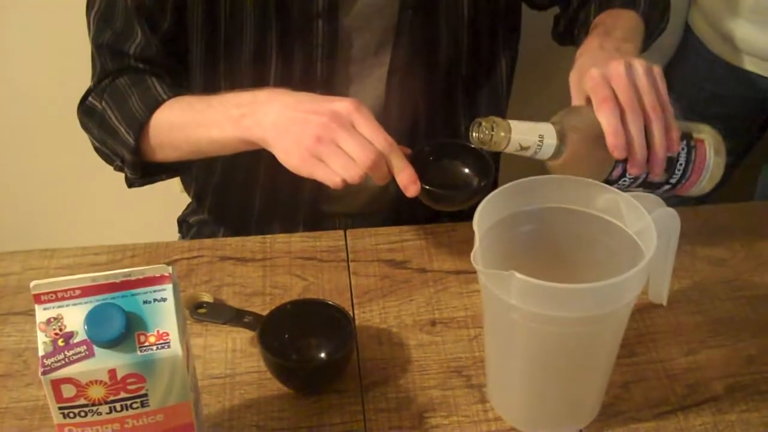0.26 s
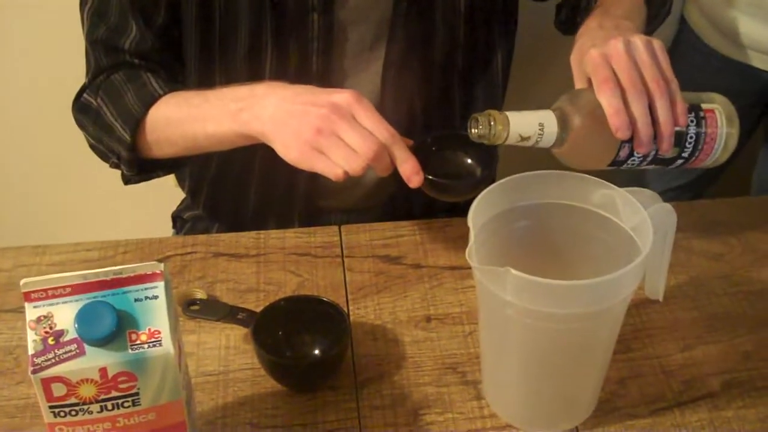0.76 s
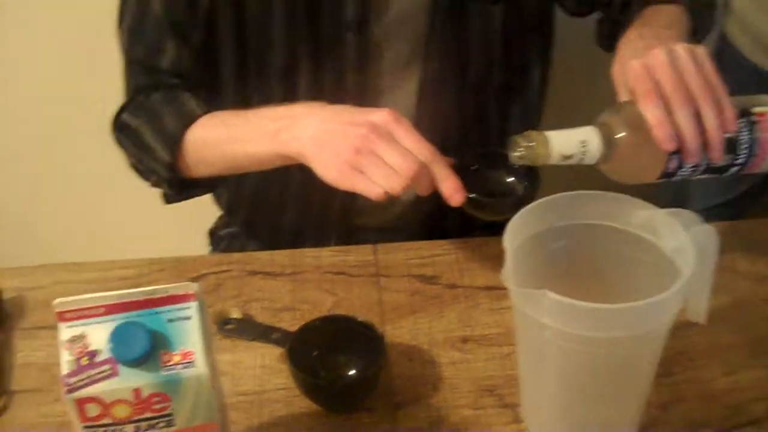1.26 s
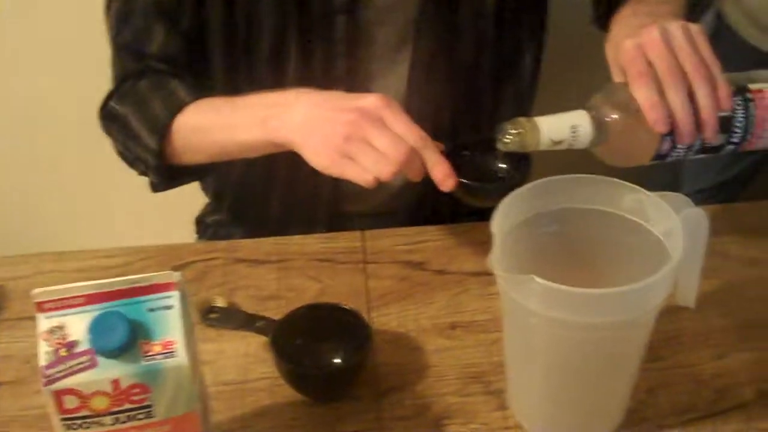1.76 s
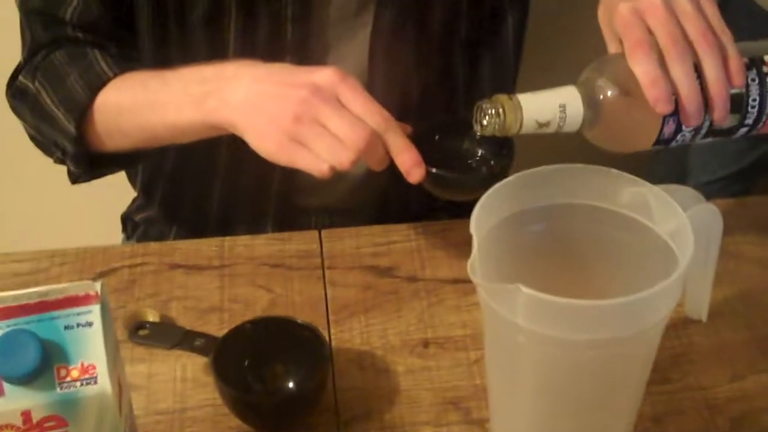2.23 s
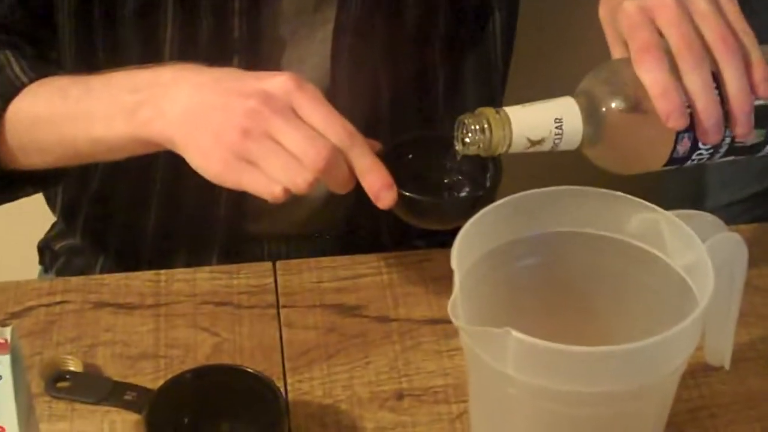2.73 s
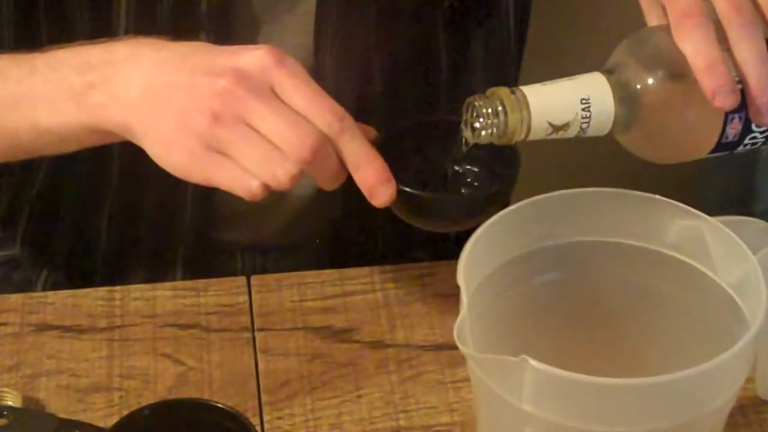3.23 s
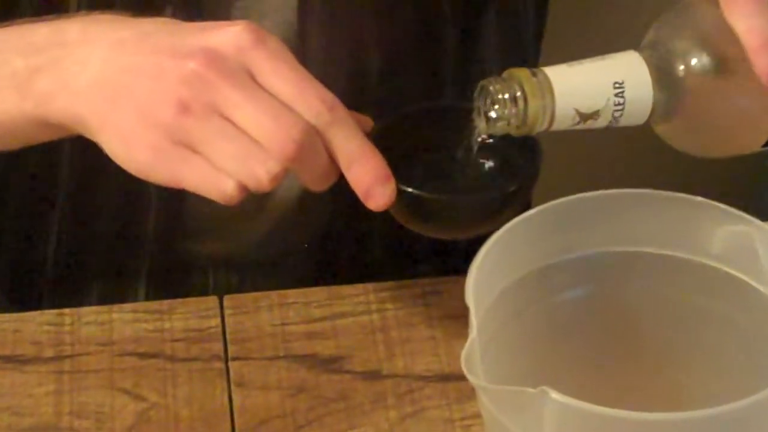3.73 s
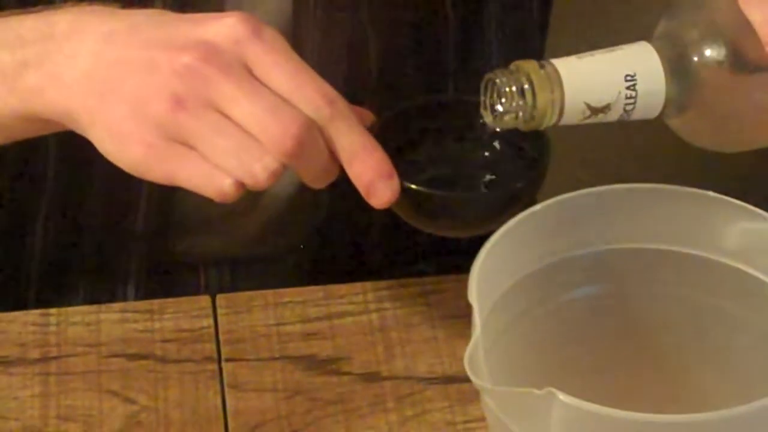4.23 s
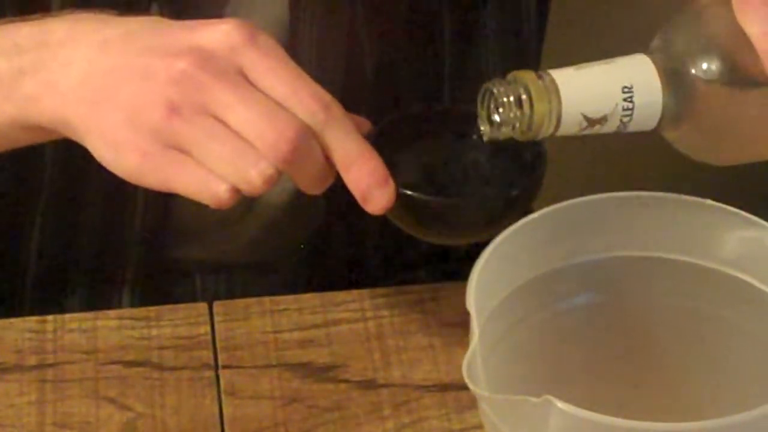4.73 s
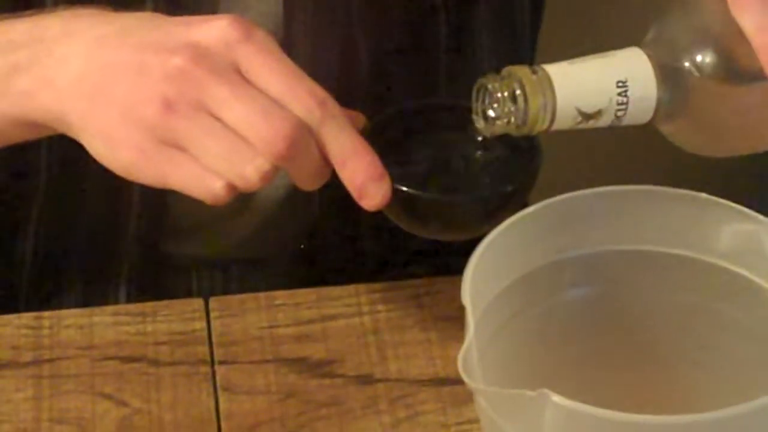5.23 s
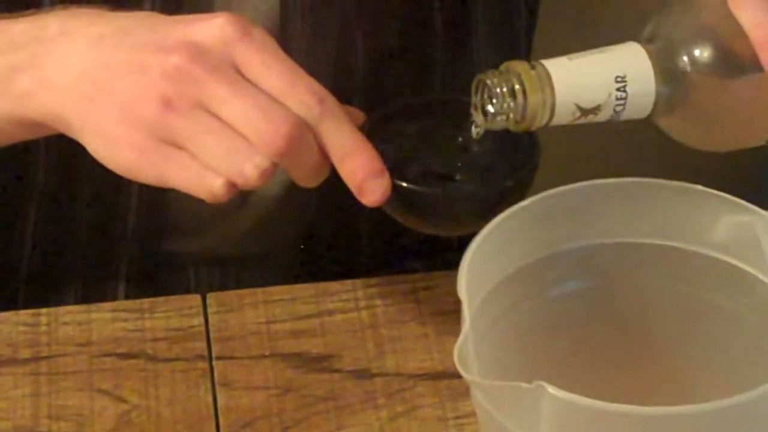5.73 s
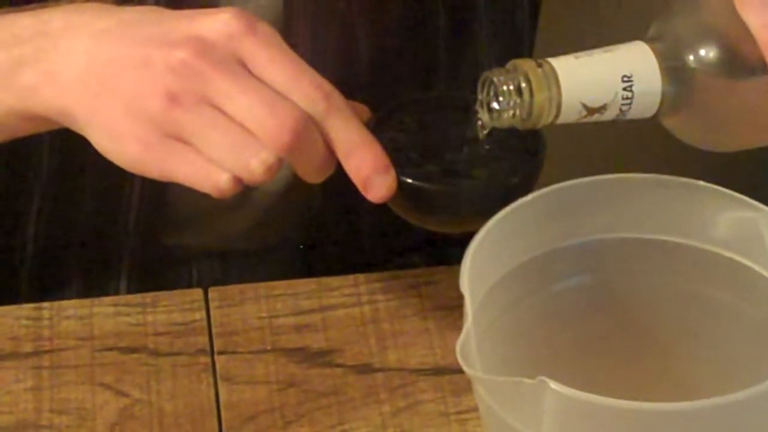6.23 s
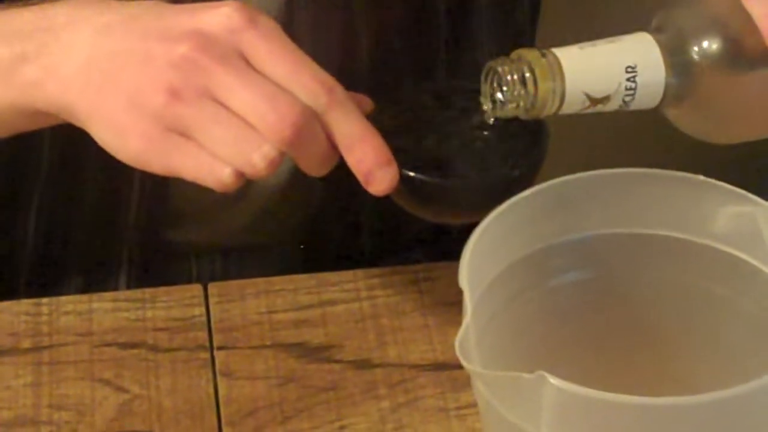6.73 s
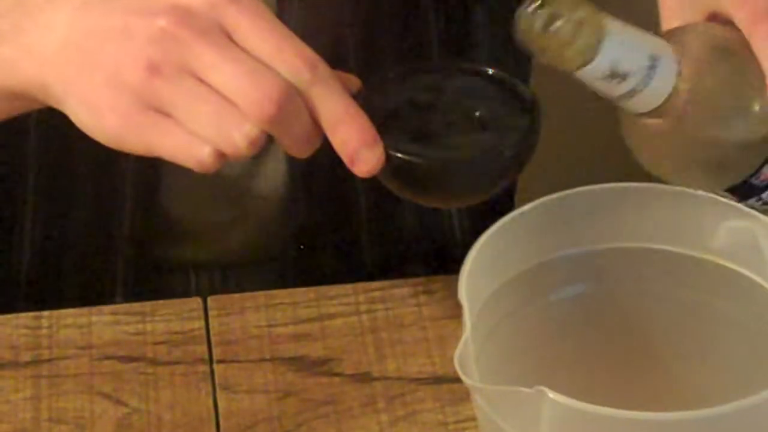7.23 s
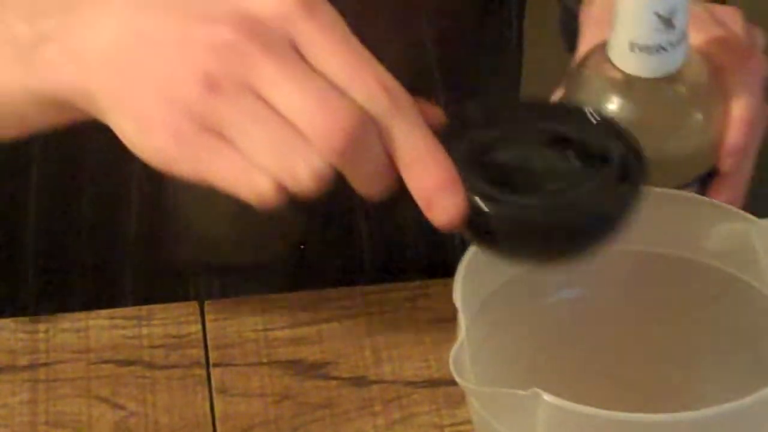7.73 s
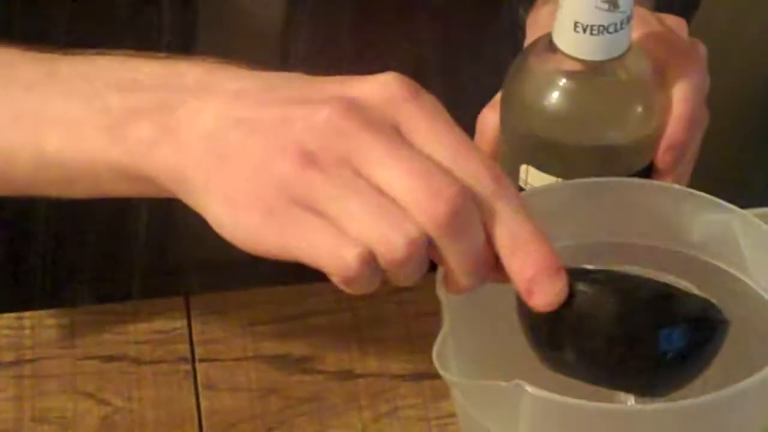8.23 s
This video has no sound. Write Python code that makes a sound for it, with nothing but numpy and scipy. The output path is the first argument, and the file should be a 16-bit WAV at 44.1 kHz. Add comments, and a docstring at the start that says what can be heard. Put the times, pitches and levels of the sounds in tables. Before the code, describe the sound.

Close bottle gulps, glassy clinks and tiny high plips over faint hum, then the bottle knocks down on a table and liquid splashes into a pitcher.

```python
"""An appliance hums in a small room, then air gulps back through the neck of a glass bottle:
spirit is poured slowly into a plastic measuring cup. The bottle clinks on the cup and drops ping in the liquid.
The bottle is set down on a wooden table and the cup is tipped, splashing, into a pitcher.
Hum is wavering sines, air and spray are coloured noise, gulps and contacts are decaying modes with noise bursts,
and drops and splashes are ringing bubbles; echoes, scattering and a diffuse tail place them in the room."""
import sys
import numpy as np
from scipy import signal
from scipy.fft import rfft, irfft, next_fast_len
from scipy.io import wavfile

SR = 44100
rng = np.random.default_rng(int(sys.argv[2]) if len(sys.argv) > 2 else 0)


def dump_mix(stems):
    """Bounce the given channels to the path in sys.argv[1] as a 16-bit WAV at rate SR."""
    frames = np.atleast_2d(stems).T  # one column per channel
    limited = np.clip(frames, -1, 1)  # hard clip at full scale
    pcm = np.round(limited * 32767).astype(np.int16)
    wavfile.write(sys.argv[1], SR, pcm)


N = 373659
TIME = np.arange(N) / SR
RING = TIME[:SR // 2]   # time axis of a single sound, half a second


def from_db(db):
    """Turn decibels into an amplitude factor."""
    return 10 ** (np.asarray(db) / 20)


def rms_one(x):
    """Scale to an rms of one."""
    return x / np.sqrt(np.mean(x ** 2) + 1e-20)


def peak_one(x):
    """Scale to a peak of one."""
    return x / (np.abs(x).max() + 1e-20)


def at_hz(points, hz):
    """Read a table on a log-frequency axis."""
    known_hz, values = np.transpose(points)
    return np.interp(np.log(np.maximum(hz, 1)), np.log(known_hz), values)


def add(track, s, sound):
    """Mix a sound into a track from time s on."""
    start = min(max(round(s * SR), 0), len(track))
    track[start:start + len(sound)] += sound[:len(track) - start]


def colour(x, spectrum, share=1):
    """Shape a sound by a (f/Hz, level/dB) table, its dB values times share."""
    size = next_fast_len(x.shape[-1] + SR // 20)
    gain = from_db(share * at_hz(spectrum, np.fft.rfftfreq(size, 1 / SR)))
    return irfft(rfft(x, size) * gain, size)[..., :x.shape[-1]]


def soften(x, hz):
    """A softer contact loses its treble: a gentle low-pass."""
    return signal.sosfilt(signal.butter(1, min(hz, .45 * SR), fs=SR, output="sos"), x)


def thin(x, hz):
    """Objects smaller than the wavelength radiate little bass: a high-pass."""
    return signal.sosfilt(signal.butter(2, hz, "high", fs=SR, output="sos"), x)


def fade(t60):
    """Exponential decay that loses 60 dB in t60 seconds."""
    return from_db(-60 * np.minimum(RING / t60, 5))


def ring(modes):
    """Struck modes (f/Hz, level/dB, t60/s) of alternating sign."""
    out = 0
    for k, (hz, db, t60) in enumerate(modes):
        out = out + (-1) ** k * from_db(db) * fade(t60) * np.sin(2 * np.pi * hz * RING)
    return out


def burst(spectrum, t60):
    """Countless close modes die away together like coloured noise."""
    noise = rng.standard_normal(len(RING))
    return rms_one(colour(noise, spectrum)) * fade(t60)


def bubble(hz, cycles, rise):
    """A trapped bubble swells within about a cycle, rings on and rises in pitch as it nears the surface."""
    turns = RING[:int(cycles / hz * SR) + 2] * hz
    age = turns / cycles
    tone = np.sin(2 * np.pi * turns * (1 + rise * age / 2))
    decay = np.exp(-np.log(1000) * age)   # 60 dB down after the given cycles
    return tone * decay * (1 - np.exp(-turns))


# left-right likeness of diffuse sound: (f/Hz, correlation)
DIFFUSE_LIKENESS = [(30, 0.26), (130, 0.91), (500, 0.9), (1300, 0.79), (3000, 0.23), (6500, 0.081),
                    (12000, 0.055)]


def diffuse(size):
    """Stereo noise, most alike at both ports in the low mids and ever less so in the treble."""
    mid, side = rfft(rng.standard_normal((2, size)))
    alike = np.clip(at_hz(DIFFUSE_LIKENESS, np.fft.rfftfreq(size, 1 / SR)), -.999, .999)
    return irfft(np.sqrt(1 + alike) * mid + np.sqrt(1 - alike) * side * [[1], [-1]], size)


def ports(pair, balance):
    """Each microphone port has its own treble resonance, so the balance shifts with frequency."""
    return np.array([colour(pair[0], balance, 0.48), colour(pair[1], balance, -0.52)])


# room air and appliance noise: (f/Hz, level/dB per Hz)
AIR_COLOUR = [(25, -15), (80, -13), (170, -6.5), (310, -0.5), (490, -1), (590, -8.5), (900, -6.5),
              (1400, -14), (2000, -20), (3000, -22.5), (5000, -25), (7000, -26.5), (10000, -31.5),
              (14500, -31.5)]
# appliance hum and a faint electric whine: (f/Hz, rms level/dB, waver share, wavers per s)
HUM_LINES = [(61.2, -70, 0.24, 1.3), (117.8, -67.5, 0.26, 2.7), (219.3, -52, 0.28, 3.99),
             (231.4, -64.5, 0.92, 7.3), (467.2, -51.5, 0.5, 5), (831, -65, 0.76, 20),
             (5970, -78, 0.72, 1.5), (7040, -96, 0.25, 1.5), (7977, -71.5, 0.067, 1.4)]
# tilt of the background between the ports: (f/Hz, left minus right level/dB)
BACKGROUND_BALANCE = [(50, -4.5), (200, 1), (2400, 1.2), (5500, -1.5), (8000, 10), (12000, -0.5)]


def background(air_db=-49):
    """Steady room air, with hum lines that waver in level and phase."""
    noise = diffuse(next_fast_len(N))[:, :N]
    air = from_db(air_db) * rms_one(colour(noise, AIR_COLOUR))
    hum = 0
    for hz, db, waver, per_s in HUM_LINES:
        knots = rng.standard_normal(size=(2, 400))
        swing, lean = (waver * np.interp(TIME * per_s, np.arange(len(k)), k) for k in knots)
        line = (1 + swing / 2) * np.sin(2 * np.pi * hz * TIME + 2 * lean)
        hum = hum + from_db(db) * np.sqrt(2) * line
    return ports(air + hum, BACKGROUND_BALANCE)


# air bubbles bursting behind the bottle neck: (t/s, level/dB)
GULPS = [(0.0974, -43), (0.2956, -40.5), (0.4912, -32), (0.684, -33.5), (0.9737, -34.5), (1.2077, -32),
         (1.4042, -35), (1.6147, -21.5), (1.8358, -28), (2.0534, -27), (2.2734, -30), (2.4888, -25.5),
         (2.7092, -25.5), (2.9232, -20.5), (3.1271, -29.5), (3.333, -29), (3.545, -32.5), (3.7736, -32),
         (4.0023, -41.5), (4.2496, -33.5), (4.4699, -28.5)]
# upper air resonances of the neck: (f above the note/Hz, level/dB, t60/s)
NECK_MODES = [(2080, -7, 0.03), (3850, 4.5, 0.0086), (4290, 3.5, 0.0089), (5880, 3, 0.0045),
              (8100, -14, 0.003)]
# noise colour of small contacts and spits: (f/Hz, level/dB)
CONTACT_COLOUR = [(60, -36), (300, -16.5), (1000, 7.5), (1700, 6), (2700, 0.5), (3400, -3.5), (6500, 5),
                  (9000, -8.5), (14000, -24)]
TILT_S = 0.835   # time constant with which the bottle nears its pouring angle
NOTE_START_HZ, NOTE_TILTED_HZ = 903, 1381   # the air pocket shrinks with the tilt, so its note climbs
NOTE_START_DB, NOTE_TILTED_DB = 2, -8.5   # the note, relative to its gulp's level
SNAP_START_DB, SNAP_TILTED_DB = -12, -5   # the snap, likewise


def glugs(note_t60=0.055, pop_db=-3.0, spit_db=-16.5, spit_t60=0.079, pitch_scatter=0.0066):
    """Each burst snaps the neck's air column; with the tilt its resonances climb together and the snap hardens."""
    out = np.zeros(N)
    for (s, db), chance in zip(GULPS, rng.standard_normal(len(GULPS))):
        tilt = 1 - np.exp(-s / TILT_S)
        hz = NOTE_START_HZ + tilt * (NOTE_TILTED_HZ - NOTE_START_HZ)
        hz = hz * (1 + pitch_scatter * chance)
        note_db = db + NOTE_START_DB + tilt * (NOTE_TILTED_DB - NOTE_START_DB)
        snap_db = db + SNAP_START_DB + tilt * (SNAP_TILTED_DB - SNAP_START_DB)
        note = ring([(hz, note_db, note_t60)])
        snap = ring([(hz + above, level, t60) for above, level, t60 in NECK_MODES])
        add(out, s, note + from_db(snap_db) * peak_one(snap))
        # the film tears with a short pop
        add(out, s, from_db(note_db + pop_db) * bubble(hz, cycles=7.3, rise=0.14))
        # and spits against the glass
        spit = peak_one(burst(CONTACT_COLOUR, spit_t60))
        add(out, s, from_db(snap_db + spit_db) * spit)
    return out


# light knocks and ticks of the plastic cup: (t/s, level/dB, contact brightness f/Hz)
CUP_TICKS = [(0.93, -39.5, 9000), (1.43, -25, 2160), (4.927, -38.5, 12000), (4.978, -33, 4830),
             (8.128, -31.5, 8000), (8.2129, -28.5, 6040)]
# soft low bumps of handling: (t/s, level/dB, f/Hz)
HANDLING_BUMPS = [(0.455, -41, 293), (0.660, -40, 296), (3.105, -35.5, 153), (3.235, -41, 142)]
TICK_CYCLES = 125   # decay in periods of the brightness: duller contacts last longer
BUMP_REBOUND_S, BUMP_REBOUND_DB = 0.046, -9.5


def handling(tick_db=0.0, bump_s=0.0047):
    """Dry ticks of the cup and soft, swelling bumps that rebound once."""
    out = np.zeros(N)
    for s, db, bright_hz in CUP_TICKS:
        tick = burst(CONTACT_COLOUR, TICK_CYCLES / bright_hz)
        # plastic yields, so the treble falls steeply: softened twice
        tick = soften(soften(tick, bright_hz), bright_hz)
        add(out, s, from_db(db + tick_db) * peak_one(tick))
    swell = peak_one(RING * np.exp(-RING / bump_s))
    for s, db, hz in HANDLING_BUMPS:
        bump = from_db(db) * swell * np.sin(2 * np.pi * hz * RING)
        add(out, s, bump)
        add(out, s + BUMP_REBOUND_S, from_db(BUMP_REBOUND_DB) * bump)
    return out


# bottle touching the cup: (t/s, level/dB, contact brightness f/Hz)
CUP_CLINKS = [(1.033, -14.5, 9050), (1.133, -14, 8450), (1.234, -11, 11200), (1.4304, -29.5, 6000),
              (1.5575, -36.5, 7000)]
# the short ring of cup and bottle neck: (f/Hz, level/dB, t60/s)
CUP_AND_NECK_MODES = [(1310, -15.5, 0.03), (1620, -13, 0.025), (2646, -6, 0.032), (2800, -7, 0.015),
                      (3480, -9, 0.015), (4170, -4, 0.016), (4390, -8.5, 0.038), (5180, -2.5, 0.0088),
                      (5740, -4.5, 0.011), (6680, -5, 0.01), (7135, -4.5, 0.031), (7870, -8, 0.0092),
                      (9250, -12.5, 0.0079)]
# the faint, beating after-ring of the glass: (f/Hz, level/dB, t60/s)
GLASS_RING = [(2675, -36, .4), (2715, -35, .4), (4260, -29, .2), (4300, -29, .2), (4340, -29, .2)]


def clinks(crack_db=-5.0, crack_t60=0.012, chatter_db=-14.0, chatter_s=0.00068):
    """Glass meets plastic: a short crack, a brief chatter of the contact and the ring of both."""
    out = np.zeros(N)
    for s, db, bright_hz in CUP_CLINKS:
        crack = from_db(crack_db) * burst(CONTACT_COLOUR, crack_t60)
        blow = ring(CUP_AND_NECK_MODES) + ring(GLASS_RING) + crack
        blow = from_db(db) * peak_one(thin(soften(blow, bright_hz), hz=500))
        add(out, s, blow)
        for late in rng.standard_normal(size=3):
            add(out, s + chatter_s * abs(late), from_db(chatter_db) * blow)
    return out


# drops trapping a bubble in the cup: (t/s, level/dB, bubble f/Hz)
CUP_DRIPS = [(2.2362, -26.5, 5700), (2.2366, -30.5, 4640), (2.3556, -33, 6930), (2.6763, -23, 6950),
             (3.3666, -43, 6060), (3.440, -36, 6800), (3.573, -38.5, 2980), (3.6315, -44, 7120),
             (3.9044, -46, 4560), (4.2727, -43.5, 2790), (4.705, -45, 5610), (5.257, -44, 8400),
             (5.4642, -40.5, 6140), (5.532, -44, 3760), (5.7248, -45.5, 5260)]
HEAVY_DROP_DB, HEAVY_DROP_CYCLES = -21, 280   # a heavy drop's level and how long its bubble rings
CYCLES_HALVE_DB = 12.5   # a drop this much weaker rings half as many cycles
SATELLITE_LOW_HZ, SATELLITE_HIGH_HZ = 5500, 7970   # range of the extra bubbles that a drop sheds


def drips(level_db=-3.5, rise=0.025, impact_db=4.0, impact_cycles=9, spatter_db=-21.5,
          satellite_db=-4.0, satellite_growth=0.54, satellite_scatter=0.019, satellite_s=0.0016,
          satellite_cycles=170):
    """A drop plips, spatters and leaves a ringing bubble; heavier drops shed louder satellite bubbles."""
    out = np.zeros(N)
    for s, db, hz in CUP_DRIPS + dribble():
        gain = from_db(db + level_db)
        weight_db = db - HEAVY_DROP_DB
        cycles = HEAVY_DROP_CYCLES * 2 ** (weight_db / CYCLES_HALVE_DB)
        add(out, s, gain * bubble(hz, cycles, rise))
        add(out, s, gain * from_db(impact_db) * bubble(hz, impact_cycles, rise))
        add(out, s, gain * from_db(spatter_db) * soften(burst(CONTACT_COLOUR, t60=0.066), hz))
        satellite_gain = gain * from_db(satellite_db + satellite_growth * weight_db)
        for satellite_hz in np.geomspace(SATELLITE_LOW_HZ, SATELLITE_HIGH_HZ, 4):
            scattered_hz = satellite_hz * (1 + satellite_scatter * rng.standard_normal())
            satellite = bubble(scattered_hz, satellite_cycles, rise)
            add(out, s + rng.exponential(satellite_s), satellite_gain * satellite)
    return out


DRIBBLE_FROM_S, DRIBBLE_TO_S, DRIBBLE_PER_S = 2.7, 5.5, 2
DRIBBLE_DB, DRIBBLE_HZ = -45.5, 6200


def dribble(spread=0.25, count=40):
    """Faint droplets fall at random: rows of (t/s, level/dB, bubble f/Hz)."""
    times = DRIBBLE_FROM_S + np.cumsum(rng.exponential(1, count)) / DRIBBLE_PER_S
    pitches = DRIBBLE_HZ * np.exp(spread * rng.uniform(-1, 1, count))
    return [(s, DRIBBLE_DB, hz) for s, hz in zip(times, pitches) if s < DRIBBLE_TO_S]


# the bottle lands on its edge, falls flat and bounces: (t/s, level/dB, contact brightness f/Hz)
BOTTLE_KNOCKS = [(7.6765, -18, 6000), (7.6782, -15.5, 1600), (7.7053, -20, 2550)]
# dense thud of the table top: (f/Hz, level/dB)
THUD_COLOUR = [(50, -37), (110, -24), (160, -11), (350, 2.5), (750, -1), (1250, -4.5), (1600, -16),
               (2800, -17.5), (4200, -29), (6500, -13), (8000, -21), (10000, -33), (14000, -39)]
# longer modes of the table: (f/Hz, level/dB, t60/s)
WOOD_MODES = [(144.7, -24, 0.43), (256, -10.5, 0.2), (371.6, -21, 0.34), (474, -23, 0.27), (527, -26, 0.46),
              (570, -18, 0.18), (655, -28, 0.16), (672, -23, 0.26), (748, -17, 0.11), (806, -26, 0.22),
              (795, -20, 0.16), (1056, -18.5, 0.12), (1330, -30, 0.11)]


def knocks(thud_db=-3.5, thud_t60=0.074, modes_db=3.0, push_db=4.5, push_hz=640, push_t60=0.0074,
           crack_db=-10.5):
    """The heavy bottle base drives the table top: a crack, one strong push, a dense thud and longer modes."""
    out = np.zeros(N)
    body = from_db(modes_db) * ring(WOOD_MODES) + ring([(push_hz, push_db, push_t60)])
    for s, db, bright_hz in BOTTLE_KNOCKS + settling():
        crack = from_db(crack_db) * burst(CONTACT_COLOUR, t60=0.013)
        thud = from_db(thud_db) * burst(THUD_COLOUR, thud_t60)
        add(out, s, from_db(db) * soften(crack + thud + body, bright_hz))
    return thin(out, hz=150)


# the base chatters as it lands
RATTLE_FROM_S, RATTLE_GAP_S, RATTLE_DB, RATTLE_LOSS_DB, RATTLE_HZ = 7.698, 0.016, -24, 3, 700
# then it rocks, each time more weakly
ROCK_FROM_S, ROCK_GAP_S, ROCK_DB, ROCK_LOSS_DB = 7.833, 0.1, -29, 4
ROCK_HZ, ROCK_DULLING = 2700, 0.51   # brightness of the first rock; share left at each next one


def settling(count=3, uneven_s=0.002):
    """A quick, uneven rattle and a slow rocking die away: rows of (t/s, level/dB, contact brightness f/Hz)."""
    rows = []
    for k, chance in enumerate(rng.standard_normal(count)):
        s = RATTLE_FROM_S + k * RATTLE_GAP_S + uneven_s * chance
        rows.append((s, RATTLE_DB - k * RATTLE_LOSS_DB, RATTLE_HZ))
    for k in range(count):
        s = ROCK_FROM_S + k * ROCK_GAP_S
        rows.append((s, ROCK_DB - k * ROCK_LOSS_DB, ROCK_HZ * ROCK_DULLING ** k))
    return rows


# flow of the stream between gushes: (t/s, level/dB)
STREAM_FLOW = [(8.205, -66), (8.25, -40), (8.275, -35.5), (8.31, -51.5), (8.34, -39), (8.375, -34),
               (8.41, -38.5), (8.47, -31.5)]
# noise colour of the spray: (f/Hz, level/dB per Hz)
SPRAY_COLOUR = [(500, -14), (1200, -10.5), (2400, -10.5), (3250, -6.5), (3900, -2), (5200, -6), (7500, 4.5),
                (8700, -9), (10500, -16.5), (14500, -20)]


def stream(per_s=5000, spread=0.236, cycles=55, bubbles_db=-4.0, spray_db=-3.5, clump_db=3.5,
           clumps_per_s=700):
    """The cupful falls into the pitcher as a dense fizz of tiny bubbles and clumps of spray."""
    s, db = np.transpose(STREAM_FLOW)
    fizz, lasts = np.zeros(N), s[-1] - s[0]
    for chance, sharp, big in rng.standard_normal((int(per_s * lasts), 3)):
        born = s[0] + lasts * (chance % 1)
        hz = fizz_hz(born) * np.exp(spread * sharp)
        add(fizz, born, np.exp(big / 2) * bubble(hz, cycles, rise=0.074))
    # unit rms over the stream's own length, not over the whole track
    fizz = rms_one(fizz) * np.sqrt(lasts * SR / N)
    clumps = rng.standard_normal(size=20000)
    patter = from_db(clump_db * np.interp(TIME * clumps_per_s, np.arange(len(clumps)), clumps))
    spray = rms_one(colour(patter * rng.standard_normal(N), SPRAY_COLOUR))
    flow = from_db(np.interp(TIME, s, db)) * (TIME > s[0])
    return flow * (from_db(bubbles_db) * fizz + from_db(spray_db) * spray)


FIZZ_START_HZ, FIZZ_END_HZ = 7530, 5100   # the bubbles grow as the stream thickens


def fizz_hz(s):
    """Typical pitch of the bubbles in the pitcher at time s: larger bubbles ring lower."""
    return np.interp(s, [STREAM_FLOW[0][0], STREAM_FLOW[-1][0]], [FIZZ_START_HZ, FIZZ_END_HZ])


# gushes hitting the liquid in the pitcher: (t/s, level/dB, bubble f/Hz, mean bubble delay/s)
PITCHER_GUSHES = [(8.237, -16, 7280, 0.0016), (8.262, -17.5, 7600, .002), (8.3195, -16.5, 6880, 0.0011),
                  (8.341, -23, 7000, .003), (8.3637, -12.5, 5630, 0.0075), (8.407, -19, 3350, 0.0044),
                  (8.410, -17.5, 5900, .005), (8.4285, -16, 6400, 0.0029), (8.455, -15, 6130, .007)]


def splash(gush_db=-0.5, slap_db=-13.5, cycles=50, spread=0.2):
    """On top of the stream, each gush slaps the surface and throws in a swarm of bubbles of many sizes."""
    out = stream()
    for start, db, pitch_hz, length in PITCHER_GUSHES + fallbacks():
        swarm = np.zeros(len(RING))
        sizes = rng.permutation(np.linspace(-1, 1, 24))
        for k, (small, late) in enumerate(zip(sizes, rng.exponential(length, len(sizes)))):
            delay = late * (k % 3 > 0)   # every third bubble starts at once
            gain = (-1) ** k * np.exp(-delay / length / 2)
            add(swarm, delay, gain * bubble(pitch_hz * np.exp(spread * small), cycles, rise=0.049))
        slap = from_db(slap_db) * burst(SPRAY_COLOUR, t60=6 * length)
        add(out, start, from_db(db + gush_db) * (peak_one(swarm) + slap))
    return out


FALLBACK_S, FALLBACK_DB = 0.017, -9.5   # liquid thrown up by a gush lands again


def fallbacks(uneven_s=0.003, length_s=0.0044):
    """Each gush is followed by a weaker one: rows of (t/s, level/dB, bubble f/Hz, mean bubble delay/s)."""
    rows = []
    for (s, db, _, _), chance in zip(PITCHER_GUSHES, rng.standard_normal(len(PITCHER_GUSHES))):
        rows.append((s + FALLBACK_S + uneven_s * chance, db + FALLBACK_DB, fizz_hz(s), length_s))
    return rows


def scatter(t60=0.044):
    """Hands, cup and pitcher wall scatter the treble differently to each port."""
    paths = rng.standard_normal((2, len(RING))) * fade(t60) * (RING > .0003)
    treble = signal.sosfilt(signal.butter(1, 1500, "high", fs=SR, output="sos"), paths)
    return rms_one(treble) / np.sqrt(len(RING))


# decay time of the room: (f/Hz, t60/s)
ROOM_DECAY = [(150, 0.45), (600, 0.32), (2000, 0.3), (6000, 0.23), (12000, 0.21)]


def room_tail(build_s=0.013):
    """Diffuse reverberation of unit energy that builds up softly and dies sooner in the treble."""
    noise, tail = diffuse(len(RING)), 0
    edges = np.geomspace(60, 16000, 9)
    for low, high in zip(edges, edges[1:]):
        band = signal.sosfilt(signal.butter(2, [low, high], "band", fs=SR, output="sos"), noise)
        tail = tail + band * fade(at_hz(ROOM_DECAY, np.sqrt(low * high)))
    return rms_one(tail * (1 - np.exp(-RING / build_s))) / np.sqrt(len(RING))


# reflections from the table top and near surfaces: (delay t/s, level/dB)
NEAR_ECHOES = [(.0022, -18), (.0062, -12.5), (0.0099, -11), (0.0157, -9.5)]
# near sounds at the two microphone ports: (f/Hz, left minus right level/dB)
NEAR_BALANCE = [(200, -0.5), (2400, 0), (4300, -1), (5600, -5), (6500, -0.5), (7200, 13), (8300, 9),
                (10000, 13.5), (14000, 18)]


def scene():
    """Near sounds with their first echoes, scattered treble and the room's tail, over the hum."""
    gulp, hands, clink = glugs(), handling(), clinks()
    drip, table, pour = drips(), knocks(), splash()
    near = gulp + hands + clink + drip + table + pour
    heard = near.copy()
    for delay, db in NEAR_ECHOES:
        add(heard, delay, from_db(db) * soften(near, hz=4030))
    to_scatter = from_db(-5.5) * near + from_db(-23) * pour
    scattered = signal.fftconvolve(to_scatter[None], scatter(), axes=1)[:, :N]
    send = from_db(-8.5) * gulp + from_db(-4.5) * hands + from_db(-7.5) * clink
    send = send + from_db(-7.0) * drip + from_db(-4) * table + from_db(-10) * pour
    room = signal.fftconvolve(send[None], room_tail(), axes=1)[:, :N]
    return ports(heard + scattered + room, NEAR_BALANCE) + background()


CUTOFF_HZ = 14400


def record(dry):
    """The top is cut steeply by an elliptic low-pass."""
    return signal.sosfilt(signal.ellip(10, .2, 70, CUTOFF_HZ, fs=SR, output="sos"), dry)


dry = scene()
out = record(dry)
dump_mix(out)
```